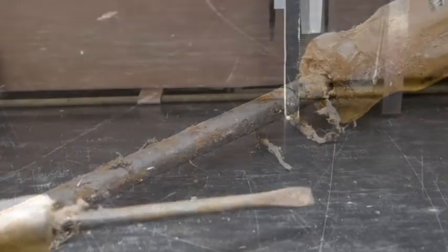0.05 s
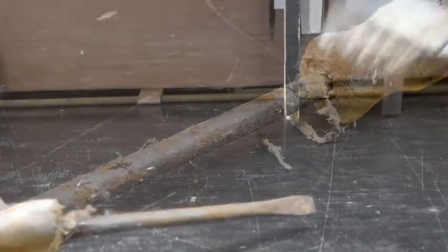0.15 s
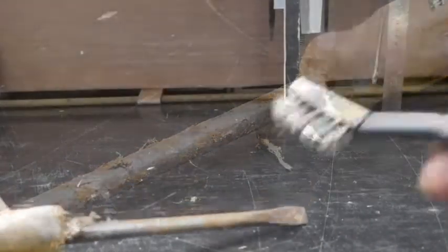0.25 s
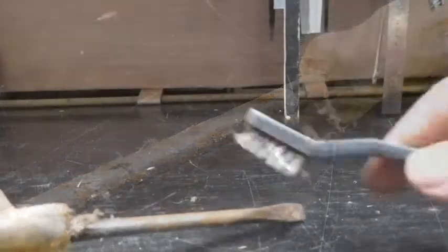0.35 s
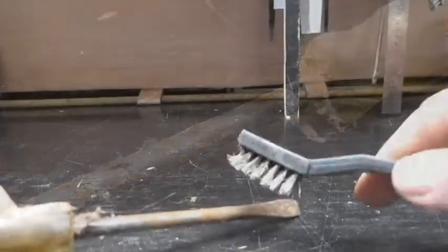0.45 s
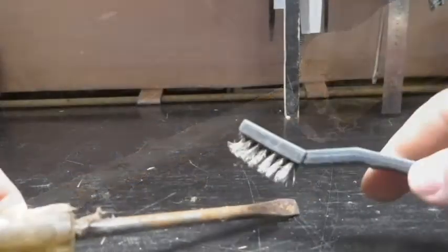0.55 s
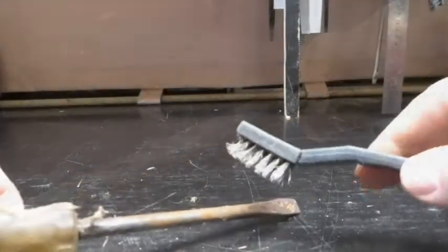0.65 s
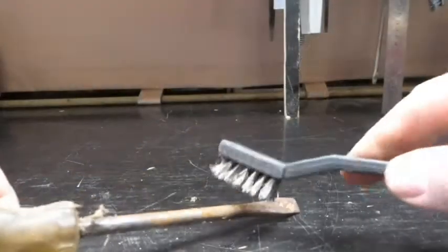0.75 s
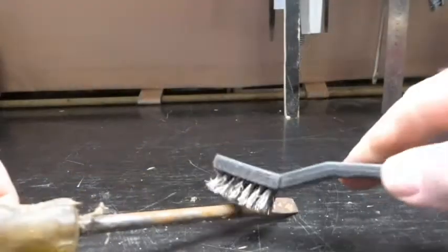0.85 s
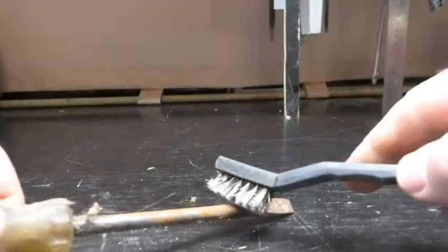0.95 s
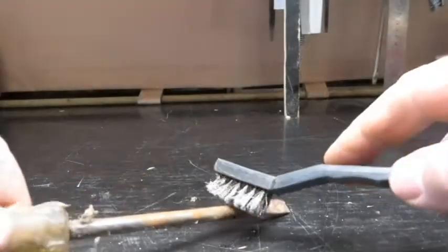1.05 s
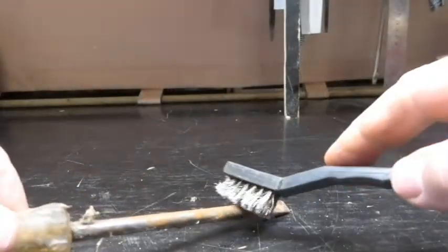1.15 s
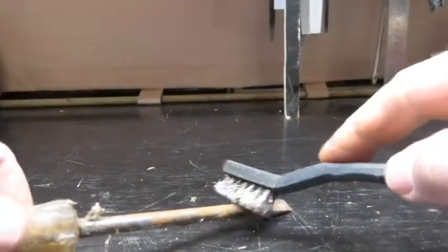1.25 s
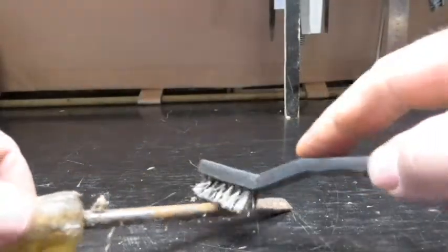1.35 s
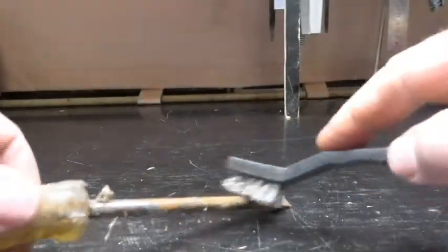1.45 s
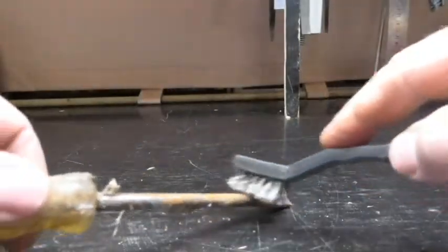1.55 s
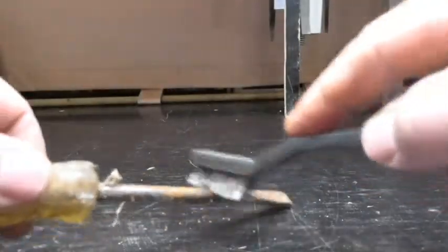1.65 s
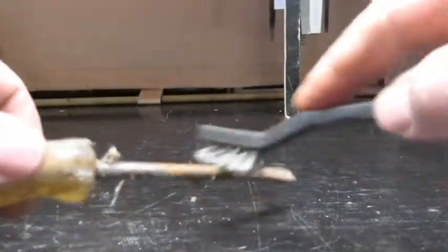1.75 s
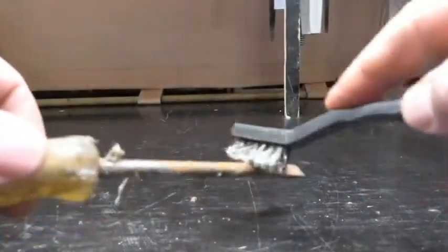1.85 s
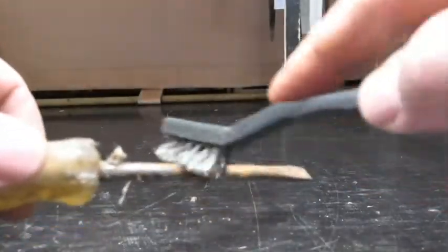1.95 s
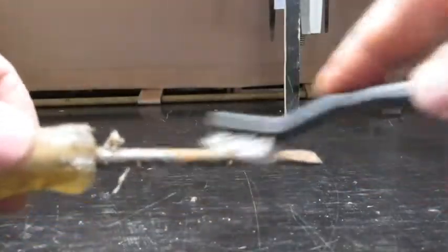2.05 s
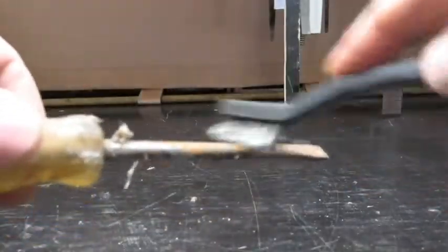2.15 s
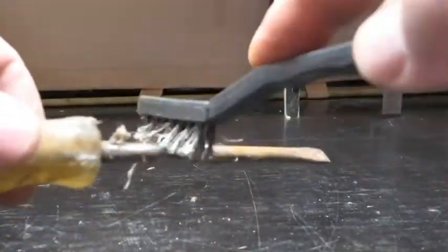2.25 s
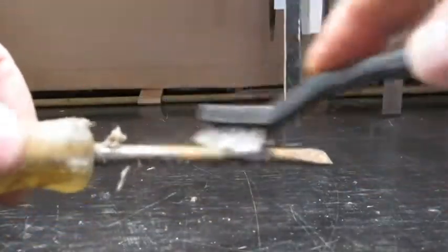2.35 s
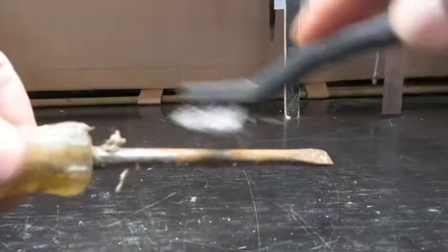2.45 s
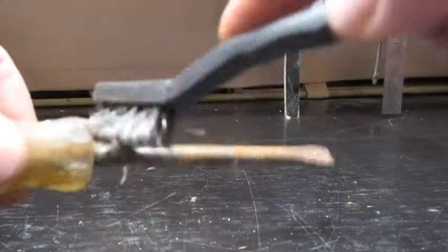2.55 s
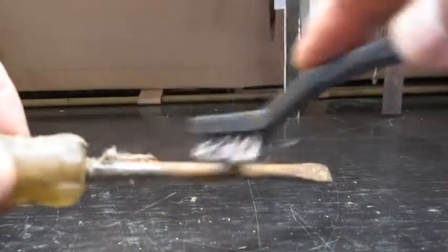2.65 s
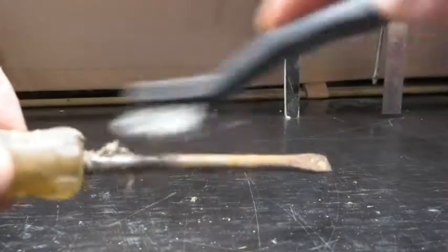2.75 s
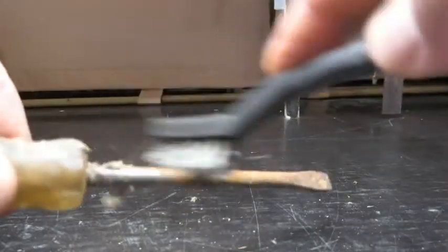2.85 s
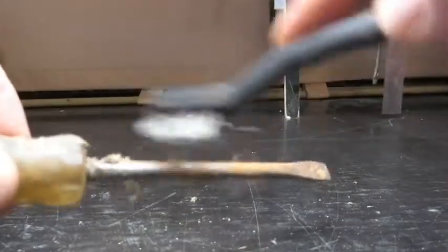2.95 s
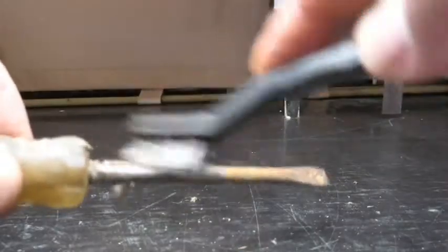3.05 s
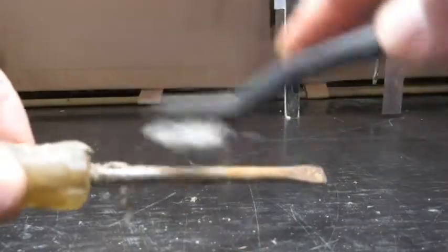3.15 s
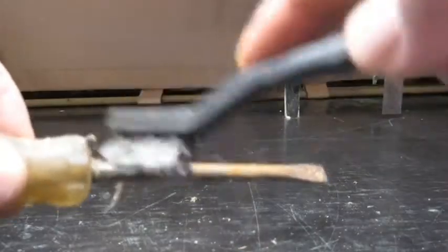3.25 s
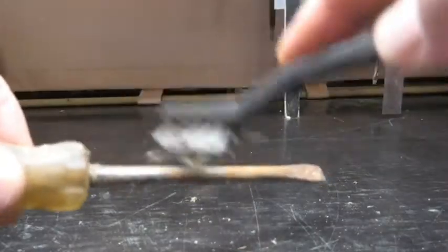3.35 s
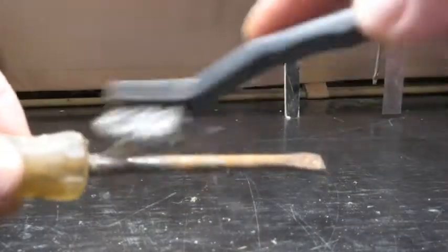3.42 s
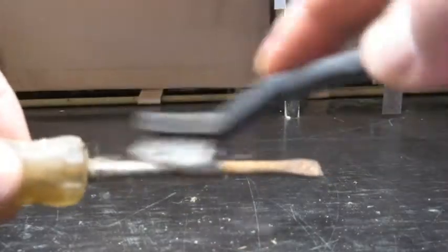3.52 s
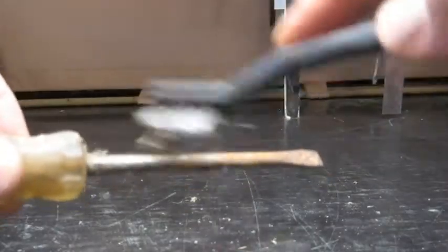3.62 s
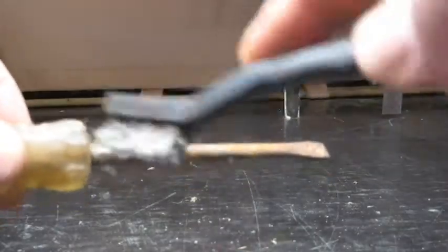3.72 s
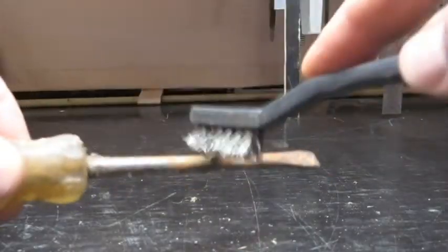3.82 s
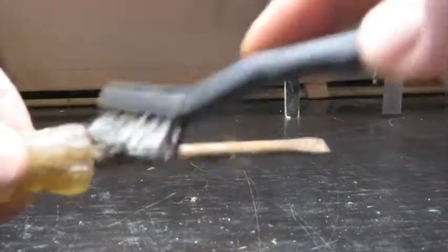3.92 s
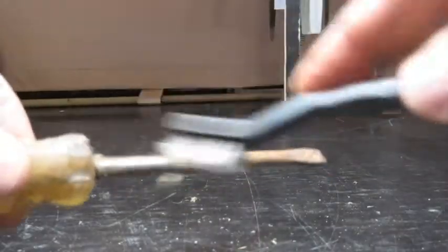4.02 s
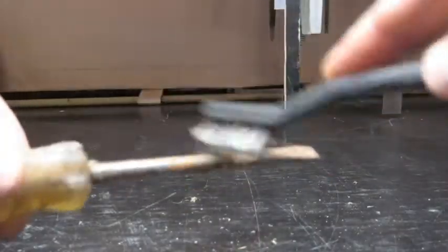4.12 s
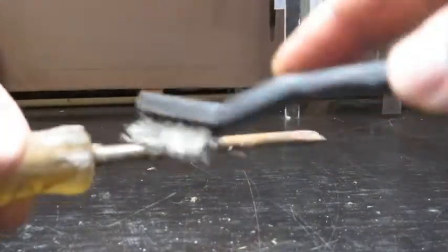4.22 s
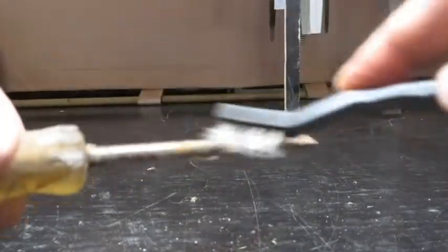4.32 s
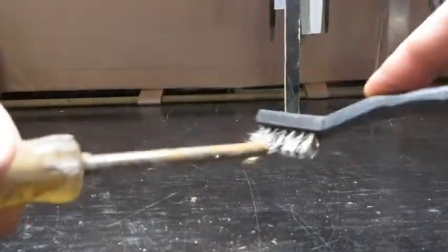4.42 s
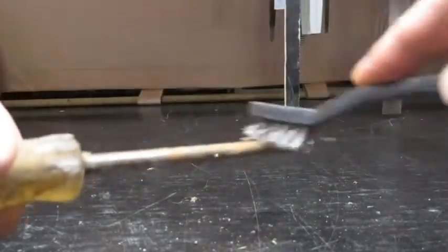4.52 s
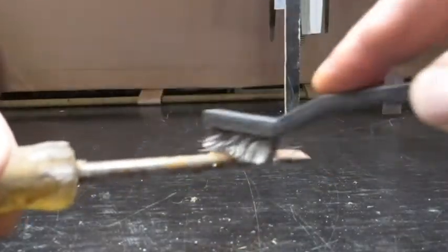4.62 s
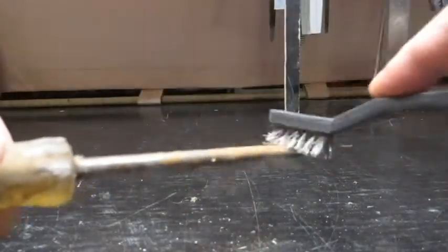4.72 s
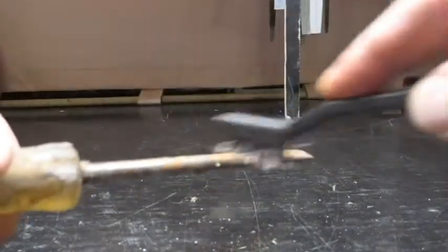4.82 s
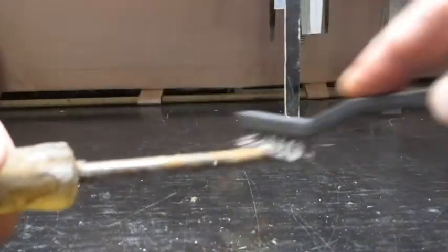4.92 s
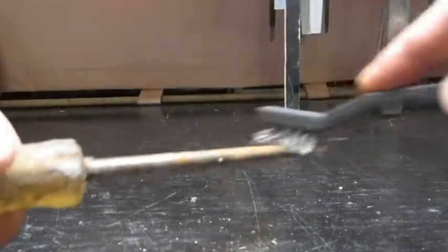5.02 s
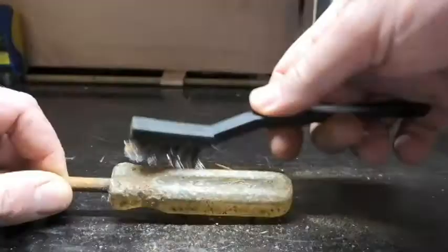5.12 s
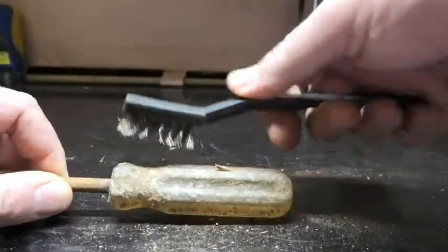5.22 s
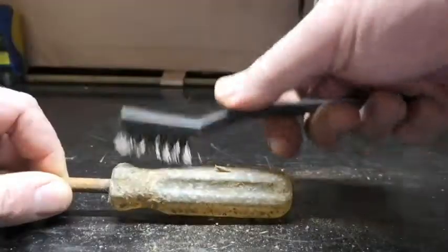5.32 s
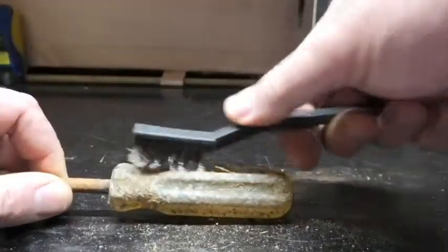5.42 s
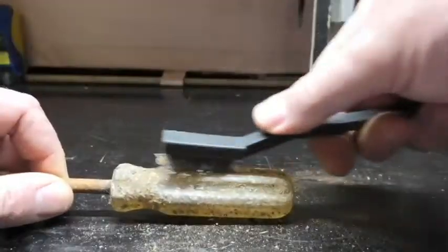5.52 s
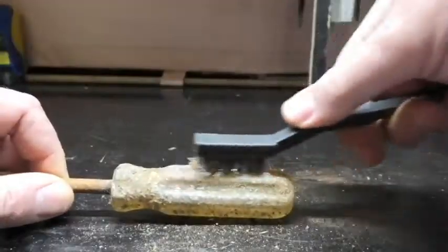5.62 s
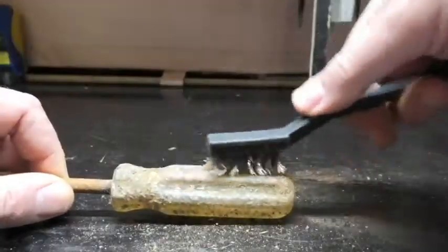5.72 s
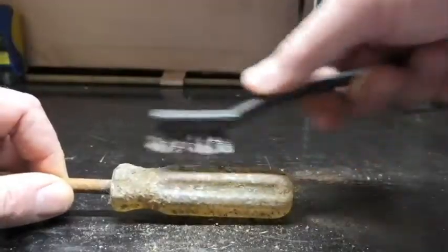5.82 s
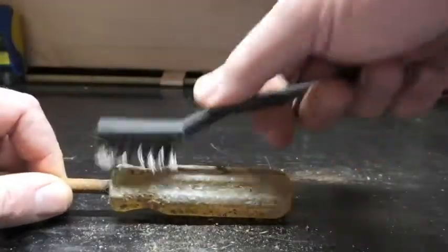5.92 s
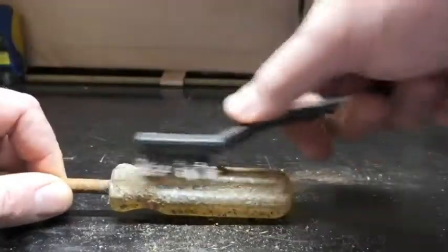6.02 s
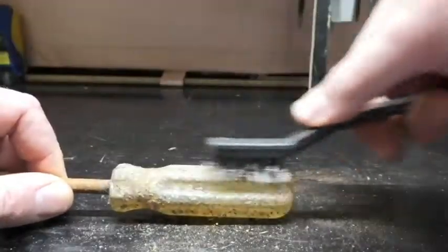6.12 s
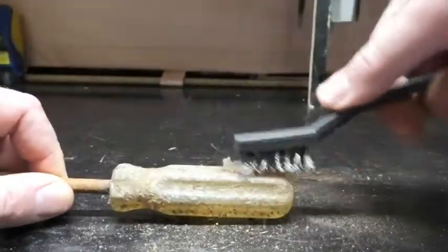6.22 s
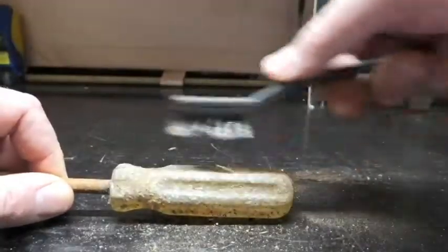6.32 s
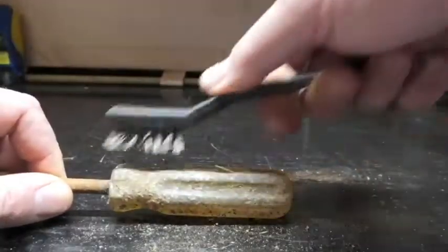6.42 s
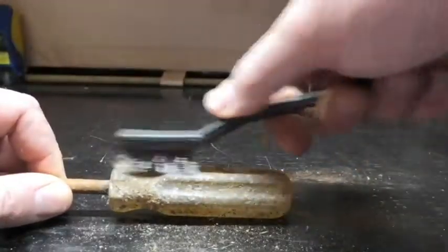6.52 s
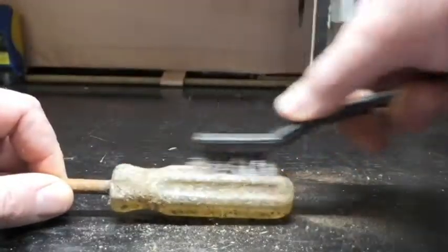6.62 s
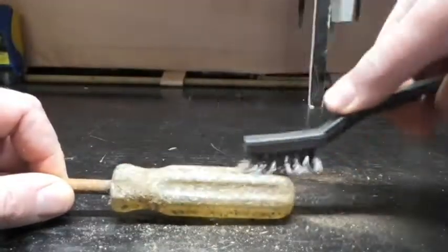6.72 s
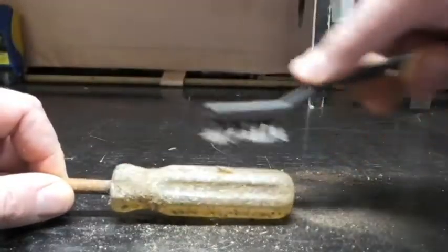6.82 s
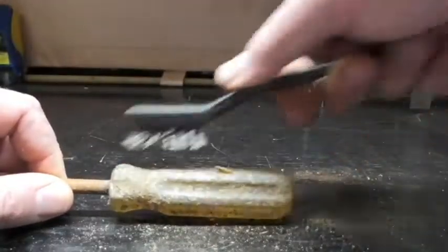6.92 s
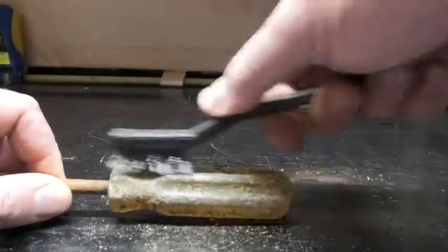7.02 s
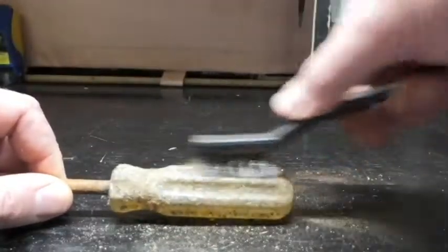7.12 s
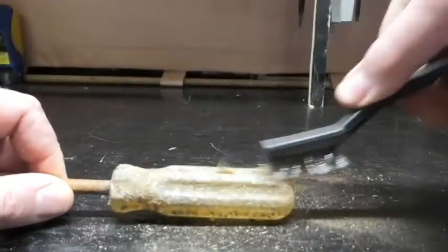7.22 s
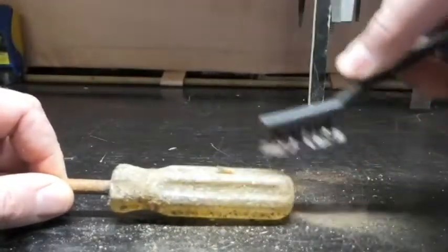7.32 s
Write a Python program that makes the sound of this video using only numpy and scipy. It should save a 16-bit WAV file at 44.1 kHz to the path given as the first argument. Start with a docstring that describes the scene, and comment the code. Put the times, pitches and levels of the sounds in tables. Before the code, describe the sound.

Close, dry stereo sound of a small wire brush cleaning a rusty tool. First a sharp double knock on the bench and low, gritty scrapes with a wavering metallic groan; next brisk, hissy scratching on bare steel, some wires singing thinly; last, four slower, fuller rasps on plastic that make the bench resonate, each begun by a cushioned thud. Steady quiet room noise lies behind.

```python
"""A small wire brush scrubs a rusty screwdriver on a workbench, close to a pair of microphones in a quiet workshop.
The blade knocks down and is scraped with its tip on the bench, then is lifted and brushed in quick strokes;
last, four long strokes run over the plastic handle. Each stroke is a swell of random wire snaps, coloured
by the surface. Whatever touches the bench rings its modes; some wires sing, the blade groans at times,
and steady room noise with a soft whirr lies behind."""
import sys
import numpy as np
from scipy import signal
from scipy.fft import irfft
from scipy.io import wavfile
from scipy.ndimage import uniform_filter1d

SR = 44100
rng = np.random.default_rng(int(sys.argv[2]) if len(sys.argv) > 2 else 0)


def pcm_store(signal):
    """Save signal as 16-bit PCM."""
    levels = np.round(np.clip(np.atleast_2d(signal), -1, 1) * 32767)
    wavfile.write(sys.argv[1], SR, levels.astype(np.int16).T)


N = 324972
TIME = np.arange(N) / SR  # s
TAPS = 8192
HZ = np.fft.rfftfreq(TAPS, 1 / SR)  # frequency grid of the colouring filters

# Long strokes on the handle, which lies on the bench. Each row: landing in seconds, length in seconds,
# landing thump in dB, bench boom at its fullest in dB, wire hiss at its fullest in dB.
HANDLE_STROKES = [(5.400, 0.46, -23, -42.5, -44.5), (5.998, 0.34, -22, -40, -41),
                  (6.52, 0.34, -23.5, -39.5, -40), (7.023, 0.33, -29.5, -38.5, -38.5)]
# Spectrum of a wire snapping on bare steel. Each row: frequency in Hz, relative level in dB.
STEEL = [(40, -5), (110, 0), (300, 0.5), (700, -3), (1500, -4.5), (1820, 1.5), (2250, -4.5), (2800, -4),
         (3400, -1), (4100, -2.5), (5000, 2.5), (6300, -3.5), (11800, 1.5), (15800, -3.5)]


def amp(db):
    """Amplitude factor of a level in dB."""
    return 10 ** (np.asarray(db) / 20)


def evened(x):
    """Scales to rms 1."""
    return x / np.sqrt(np.mean(x ** 2) + 1e-20)


def read(points, hz):
    """A spectrum in dB, joined on a log-frequency axis."""
    f, db = np.transpose(points)
    return np.interp(np.log(hz + 1), np.log(f), db)


def convolve(x, response):
    """Passes each channel through an impulse response, keeping the length of x."""
    full = signal.fftconvolve(np.atleast_2d(x), np.atleast_2d(response), axes=1)
    return full[:, :x.shape[-1]]


def colour(x, db):
    """Causal (minimum-phase) filter with the gain db on the grid HZ."""
    log_gain = np.log(amp(np.r_[db, db[-2:0:-1]]))
    spectrum = np.exp(np.conj(signal.hilbert(log_gain)))
    return convolve(x, irfft(spectrum[:len(HZ)]))


def cut(x, hz, kind, order=2):
    """Butterworth low-pass or high-pass at hz."""
    sos = signal.butter(order, min(hz, SR / 2 - 1), kind, fs=SR, output="sos")
    return signal.sosfilt(sos, x)


def add(mix, s, sound):
    """Lays a sound into the mix at s seconds."""
    part = mix[:, round(s * SR):][:, :sound.shape[-1]]
    part += sound[..., :part.shape[1]]


def noise_pair(size, apart):
    """Noise for two microphones; apart is the part that they hear in opposite sign."""
    mid, side = rng.standard_normal((2, size))
    return evened(np.array([mid + apart * side, mid - apart * side]))


def swell(start, length, peak, fullness, t=TIME):
    """A rounded rise and fall from 0 to 1 and back, highest at the share peak of its length."""
    top = start + length * np.clip(peak, .02, .98)
    ramp = np.interp(t, [start, top, start + length], [0, 1, 0])
    return np.sin(np.pi / 2 * ramp) ** abs(fullness)  # a power under 1 fills out the swell


def floor():
    """Steady room noise with a soft whirr near 1.9 kHz."""
    # Spectrum of the room. Each row: frequency in Hz, relative level in dB per Hz.
    room = [(15, -50), (25, -9.5), (141, -2.5), (516, -9.5), (641, -9.5), (1400, -12), (1840, -6.5),
            (3080, -19.5), (4140, -21.5), (5880, -29.5), (16000, -24.5)]
    air_db, whirr_db = -55.5, -66.5
    air = evened(colour(noise_pair(N, apart=0.54), read(room, HZ)))
    whirr_band = -20 * np.log10(1 + ((HZ - 1880) / 110) ** 2)
    whirr = evened(colour(noise_pair(N, apart=0.17), whirr_band))
    return amp(air_db) * air + amp(whirr_db) * whirr


def workshop(x, wet_db, t60, dull_hz):
    """A faint, short tail from the back wall and the room: decaying noise that starts after 3 ms."""
    t = np.arange(SR // 2) / SR
    decay = amp(-60 * t / t60) * (t > .003)
    tail = cut(rng.standard_normal((2, len(t))) * decay, dull_hz, "low", order=1)
    return x + amp(wet_db) * convolve(x, tail / np.linalg.norm(tail[0]))


def bench_ring(axis, blur_db, blur_t60):
    """The bench top's answer to one tap: decaying modes, with noise for the many weaker ones."""
    # Modes of the bench top. Each row: frequency in Hz, width in Hz,
    # relative level in dB when driven through the tip, the same through the handle.
    bench = [(145.6, 15.5, -9, -9), (233, 11.8, 5, -6.5), (273.6, 17.2, 3.5, 4), (369, 8.8, 8.5, 5),
             (429, 65, -8, -2.5), (648, 224, -15, -10.5), (821, 16.5, -9.5, -1), (977.3, 34, -5.5, -3),
             (1070, 11, -8.5, -4), (1107, 24, -15, -1.5), (1199, 8.5, -13, 1.5), (1338, 45, -12, 3),
             (1610, 375, -31, -9), (1960, 50, -11, -6), (2278, 117, -32, -12.5)]
    # Blur of its many weaker modes. Each row: frequency in Hz, relative level in dB.
    bench_blur = [(30, -53), (100, -7), (300, -2), (700, -8), (1400, -13), (2400, -17.5), (3300, -23),
                  (6000, -63)]
    t = np.arange(SR // 3) / SR
    ring = 0
    for k, mode in enumerate(bench):
        hz, width = mode[:2]
        decay = width * np.exp(-np.pi * width * t)
        ring = ring + (-1) ** k * amp(mode[axis]) * decay * np.sin(2 * np.pi * hz * t)
    blur = colour(noise_pair(len(t), apart=0.39) * amp(-60 * t / blur_t60), read(bench_blur, HZ))
    return evened(ring) + amp(blur_db) * evened(blur)


def tick(t):
    """The wire ends strike: a short burst in the colour of steel, peak 1."""
    t60 = 0.046  # s
    burst = colour(noise_pair(len(t), apart=0.29) * amp(-60 * t / t60), read(STEEL, HZ))
    return burst / abs(burst).max()


def groaning_blade():
    """The blade rings in its wavering bending modes, dragged on the bench or, last, as the brush flicks off its tip."""
    # Each row: start in seconds, length in seconds, lowest mode in Hz, level in dB before the swell.
    groans = [(0.424, 0.2, 370, -46), (0.669, 0.098, 360, -38.5), (0.993, 0.065, 380.3, -36.5),
              (5.145, 0.051, 354, -43.5)]
    # Bending modes of the blade. Each row: multiple of the lowest, relative level in dB.
    blade = [(1, 11), (2.599, -4), (5.4, -17.5)]
    waver, waver_hz = 0.02, 60  # rms share of the pitch, upper limit in Hz
    out, t = np.zeros((2, N)), TIME[:SR // 2]
    for start, length, hz, db in groans:
        drift = 1 + waver * evened(cut(rng.standard_normal((len(blade), len(t))), waver_hz, "low"))
        tone = 0
        for (multiple, mode_db), d in zip(blade, drift):
            phase = 2 * np.pi * np.cumsum(hz * multiple * d) / SR
            tone = tone + amp(mode_db) * np.sin(phase)
        add(out, start, amp(db) * evened(tone) * swell(0, length, peak=0.46, fullness=1.8, t=t))
    return out


def singing_wires():
    """Sliding wires ring in a narrow band of noise that swells and fades."""
    # Each row: start in seconds, length in seconds, centre in Hz, width in Hz, level in dB before the swell.
    sings = [(0.602, 0.014, 3900, 1010, -50.5), (1.629, 0.23, 3170, 377, -52),
             (1.684, 0.12, 1890, 140, -48), (1.938, 0.11, 1790, 80, -44.5), (2.188, 0.13, 1860, 100, -46),
             (2.321, 0.13, 1780, 80, -49.5), (4.267, 0.24, 4700, 600, -42), (5.21, 0.12, 10800, 2000, -55)]
    out = np.zeros((2, N))
    for start, length, hz, width, db in sings:
        band_db = -20 * np.log10(1 + ((HZ - hz) / width) ** 2)
        band = evened(colour(noise_pair(SR, apart=0.21), band_db))
        add(out, start, amp(db) * band * swell(0, length, peak=0.29, fullness=2.2, t=TIME[:SR]))
    return out


def landings():
    """The brush ticks on the lifted shaft, which gives way in the hand and swings back once or twice."""
    # Each row: time in seconds, peak of the thump's envelope in dB, wire tick peak in dB.
    touches = [(2.59, -31.5, -33.5), (2.826, -34, -38.5), (3.053, -41.5, -40), (3.268, -37, -31.5),
               (3.488, -40.5, -33), (3.722, -39, -33.5), (3.975, -39.5, -29), (4.244, -43, -32),
               (4.505, -64, -35), (4.657, -49, -30)]
    bounce_hz, peak_s = 157.5, 0.0029  # pitch, time to the top of the envelope
    out, t = np.zeros((2, N)), TIME[:SR // 4]
    envelope = t / peak_s * np.exp(1 - t / peak_s)
    bounce = -envelope * np.sin(2 * np.pi * bounce_hz * t)
    for s, thump_db, tick_db in touches:
        add(out, s, amp(thump_db) * bounce + amp(tick_db) * tick(t))
    return out


def blows():
    """Each blow clacks and thumps the bench, duller when cushioned by the bristles, and the wire ends tick."""
    # The screwdriver knocks on the bench. Each row: time in seconds, thump peak in dB before the flex is added,
    # hardness as a cut-off in Hz, wire tick peak in dB.
    knocks = [(0.301, -13, 2600, -47), (0.324, -18.5, 1750, -52), (0.682, -30.5, 1340, -38.5),
              (0.893, -43, 2220, -46), (0.941, -37, 343, -47), (1.231, -33.5, 890, -50),
              (1.291, -28.5, 1650, -37), (1.375, -30, 198, -36), (1.672, -29.5, 220, -35),
              (5.152, -36.5, 420, -55), (5.309, -42, 520, -64), (5.432, -36, 346, -38),
              (7.076, -35, 340, -43)]
    cushion_hz, handle_tick_db = 344, -35
    on_handle = [(s, db, cushion_hz, handle_tick_db) for s, _, db, _, _ in HANDLE_STROKES]
    clack_t60, hand_t60, flex_t60 = 0.06, 0.17, 0.07  # s
    clack_db = 15.8  # relative to the ring, before the low-passes
    flex_db, flex_hz = -18, 150  # dB relative to the thump's peak
    wood_hz = 3200  # the wood carries little above this
    out, ring = np.zeros((2, N)), bench_ring(axis=3, blur_db=-3, blur_t60=0.1)
    t = np.arange(ring.shape[1]) / SR
    held = ring * amp(-60 * t / hand_t60)  # the hand damps the ring
    # the whole bench top gives a little
    flex = amp(flex_db - 60 * t / flex_t60) * np.sin(2 * np.pi * flex_hz * t)
    for s, thump_db, hard_hz, tick_db in list(knocks) + on_handle:
        clack = noise_pair(len(t), apart=0.11) * amp(clack_db - 60 * t / clack_t60)
        thump = cut(held + clack, hard_hz, "low", order=4)
        thump = cut(thump, wood_hz, "low", order=4)
        add(out, s, amp(thump_db) * (thump / abs(thump).max() + flex) + amp(tick_db) * tick(t))
    return out


def snaps(size, per_s, spread_db, clump_db, clump_hz, slide, apart):
    """Wires catch and spring free, tuft by tuft, over the smooth noise of those that only slide."""
    strength = amp(spread_db * np.minimum(rng.exponential(1, size), 3.9)) * rng.choice([-1, 1], size)
    clicks = evened(strength * (rng.random(size) < per_s / SR))
    place = apart * rng.standard_normal(size)  # each snap leans to one microphone
    tufts = evened(cut(rng.standard_normal(size), clump_hz, "low"))
    wires = clicks * np.array([1 + place, 1 - place]) + slide * noise_pair(size, apart)
    return evened(wires * amp(clump_db * tufts))


def scrub_on_bench(wires, surface, ring, hiss_gain, boom_gain, rasp_gain, travel):
    """The same snaps hiss in the air and shake the bench: pressure makes it boom, speed makes it rasp."""
    hiss = evened(colour(wires, read(surface, HZ))) * hiss_gain
    wood = convolve(wires, ring)
    boom = evened(cut(wood, 555, "low", order=4)) * boom_gain
    rasp = cut(wood, 810, "high", order=4)
    # as travel rises, the weight of the rasp shifts from the higher modes to the lower
    shift_db, split_hz = 4, 1450
    lean = amp(-shift_db * travel)
    higher = cut(rasp, split_hz, "high", order=3) * lean
    lower = cut(rasp, split_hz, "low", order=3) / lean
    return hiss + boom + evened(higher + lower) * rasp_gain


def tip():
    """Slow scraping: few wires let go at a time, and boom, rasp and hiss swell together."""
    # Scrapes with the tip on the bench. Each row: start in seconds, length in seconds,
    # share of it spent speeding up, bench boom at its fullest in dB, wire hiss at its fullest in dB.
    strokes = [(0.30, 0.4, 0.19, -44, -65.5), (0.665, 0.14, 0.067, -43, -55.5),
               (0.888, 0.037, 0.28, -40, -56), (0.925, 0.19, 0.38, -40, -62.5),
               (1.05, 0.43, 0.27, -44.5, -61), (1.275, 0.18, 0.43, -37, -46),
               (1.425, 0.16, 0.34, -38.5, -47), (1.56, 0.15, 0.49, -39, -46),
               (1.64, 0.135, 0.46, -56, -43.5)]
    # Spectrum of a wire snapping on the rusty tip. Each row: frequency in Hz, relative level in dB.
    rust = [(200, -42), (2000, -7), (3200, 2.5), (5200, 4.5), (6800, 3.5), (10000, 10.5), (12500, 9),
            (15800, 3.5)]
    rasp_db = -5  # relative to the boom
    weight_db, weight_hz = -10.5, 170  # leaning on the tip makes the whole bench rumble below this pitch
    wires = snaps(size=N, per_s=730, spread_db=1.5, clump_db=1.5, clump_hz=80, slide=0.87, apart=0.14)
    hiss, boom = np.zeros((2, N))
    for start, length, peak, bench_db, hiss_db in strokes:
        effort = swell(start, length, peak, fullness=1)
        hiss = np.hypot(hiss, amp(hiss_db) * effort)
        boom = np.hypot(boom, amp(bench_db) * effort)
    travel = np.interp(TIME, [strokes[0][0], strokes[-1][0]], [-0.3, 0.8])
    ring = bench_ring(axis=2, blur_db=-8, blur_t60=0.062)
    low_wood = evened(cut(convolve(wires, ring), weight_hz, "low", order=4))
    rumble = amp(weight_db) * low_wood * boom
    return rumble + scrub_on_bench(wires, rust, ring, hiss, boom, amp(rasp_db) * boom, travel)


def shaft():
    """Quick strokes on the lifted steel; each bends other wires, whose many resonances ripple the hiss."""
    # Each row: start in seconds, length in seconds, hiss level in dB before the swell.
    strokes = [(1.74, 0.18, -44), (1.906, 0.13, -33.5), (2.027, 0.14, -35.5), (2.181, 0.12, -28.5),
               (2.295, 0.18, -36), (2.604, 0.11, -35.5), (2.839, 0.1, -35), (3.061, 0.1, -37),
               (3.271, 0.11, -38.5), (3.495, 0.12, -38), (3.734, 0.14, -38.5), (3.978, 0.18, -40),
               (4.26, 0.29, -40.5), (4.539, 0.11, -37), (4.653, 0.14, -37.5), (4.785, 0.12, -35),
               (4.902, 0.15, -37), (5.041, 0.13, -33)]
    # How a harder stroke changes the colour, hollowing out the middle.
    # Each row: frequency in Hz, change in dB per dB of force.
    brighten = [(250, 0.88), (900, 0), (1400, 0.14), (1850, 0.35), (2600, 0.63), (4000, 0.2), (8000, 0.98)]
    plain_db = -40.5  # hiss level at which a stroke has the plain steel colour; harder ones change it
    rise_s = 0.066  # the hand takes the same time to reach full speed in every stroke
    ripple_db = 2  # rms, less below 2 kHz
    out = np.zeros((2, N))
    grit_db = np.linspace(3.5, 1.9, len(strokes))  # the snaps grow more even as the rust wears off
    for (start, length, db), spread_db in zip(strokes, grit_db):
        speed = swell(0, length, rise_s / length, fullness=1.18, t=TIME[:SR // 2])
        wires = snaps(size=SR // 2, per_s=6500, spread_db=spread_db, clump_db=1.5, clump_hz=221,
                      slide=0.83, apart=0.22)
        ripple = evened(uniform_filter1d(rng.standard_normal(len(HZ)), size=36))
        ripple = ripple * np.minimum(HZ / 2000, 1)
        tone_db = read(STEEL, HZ) + (db - plain_db) * read(brighten, HZ) + ripple_db * ripple
        add(out, start, amp(db) * evened(colour(wires, tone_db)) * speed)
    return out


def handle():
    """Long strokes along the plastic, all with one gesture; the handle lies a little differently each time."""
    # Spectrum of a wire snapping on grimy plastic. Each row: frequency in Hz, relative level in dB.
    grime = [(200, -32), (2000, -20.5), (3200, 0), (5000, -6.5), (7000, -2), (10000, 1.5), (12500, 1),
             (15800, -7.5)]
    press_s = 0.074  # the hand leans in at once
    speed_peak, rasp_peak = 0.49, 0.53  # shares of the stroke
    rasp_db = 2.5  # relative to the boom
    # the fluted handle rocks under the brush, so its pressure on the bench wavers
    ridges_db, ridges_hz = 2, 34.3  # rms, upper limit
    out, t = np.zeros((2, N)), TIME[:SR]
    for start, length, _, bench_db, hiss_db in HANDLE_STROKES:
        wires = snaps(size=len(t), per_s=2400, spread_db=0.0, clump_db=1.8, clump_hz=110,
                      slide=0.97, apart=0.1)
        hiss = amp(hiss_db) * swell(0, length, speed_peak, fullness=1.17, t=t)
        boom = amp(bench_db) * swell(0, length, press_s / length, fullness=0.63, t=t)
        rasp = amp(bench_db + rasp_db) * swell(0, length, rasp_peak, fullness=1.31, t=t)
        travel = np.interp(t, [0, length], [-1, 1], right=0)
        ridges = amp(ridges_db * evened(cut(rng.standard_normal(len(t)), ridges_hz, "low")))
        ring = bench_ring(axis=3, blur_db=-4.5, blur_t60=0.77)
        rasp = rasp * np.sqrt(ridges)
        add(out, start, scrub_on_bench(wires, grime, ring, hiss, boom * ridges, rasp, travel))
    return out


def scene():
    """Brush, blade and bench in the workshop, over room noise that fades in."""
    strokes = tip() + shaft() + handle()
    work = strokes + groaning_blade() + singing_wires() + landings() + blows()
    work = cut(work, 60, "high", order=3)  # the small objects radiate no deep bass
    fade_in = amp(np.interp(TIME, [0, .3, .6], [-15, -5, 0]))
    return workshop(work, wet_db=-15.5, t60=0.27, dull_hz=4270) + floor() * fade_in


def record(dry):
    """The two microphones differ slightly in colour; then a low-pass limits the band."""
    # Balance of the microphones. Each row: frequency in Hz, left minus right in dB.
    balance = [(40, -7), (250, 0.5), (500, -1), (1100, 1.5), (2000, 1.5), (4000, -0.8), (8000, 0),
               (13000, -2.4)]
    edge_hz = 16150
    lean_db = read(balance, HZ) / 2
    pair = np.vstack([colour(dry[0], lean_db), colour(dry[1], -lean_db)])
    band_limit = signal.firwin(511, edge_hz, window=("kaiser", 9), fs=SR)
    return signal.oaconvolve(pair, band_limit[None], "same")


dry = scene()
out = record(dry)
pcm_store(out)
```